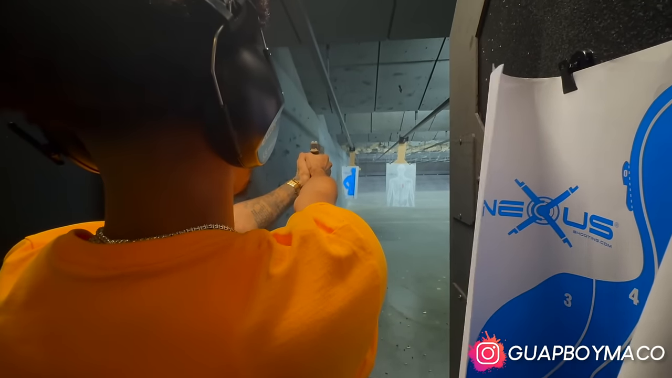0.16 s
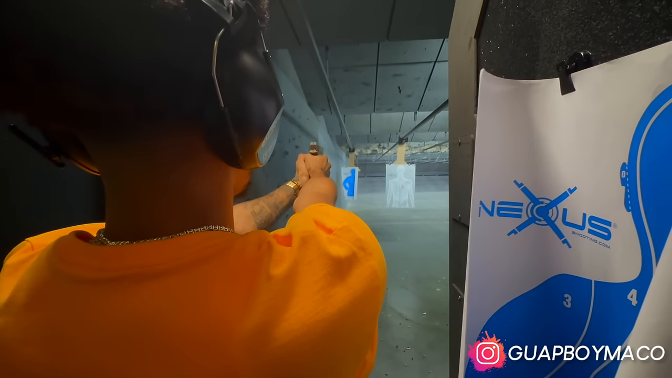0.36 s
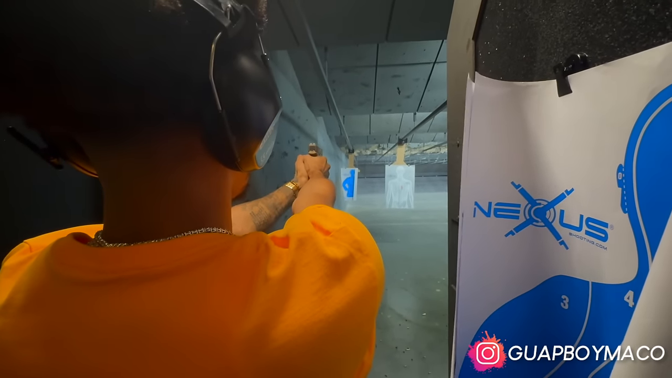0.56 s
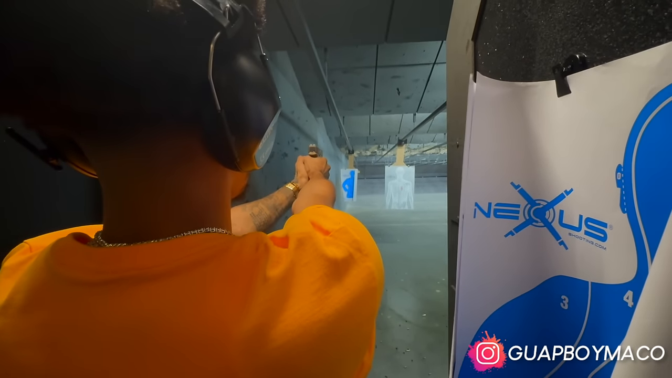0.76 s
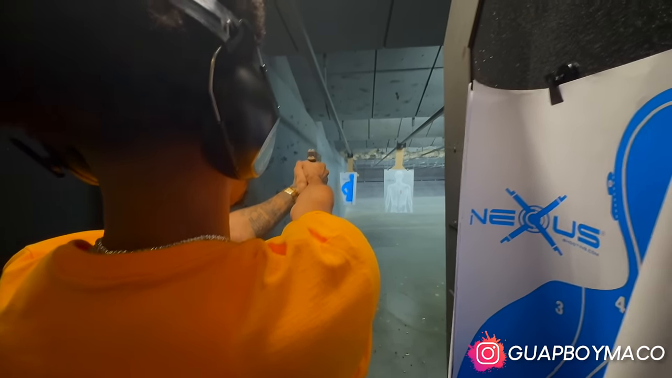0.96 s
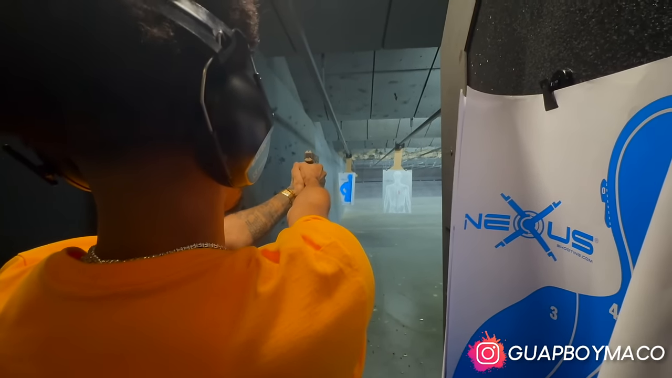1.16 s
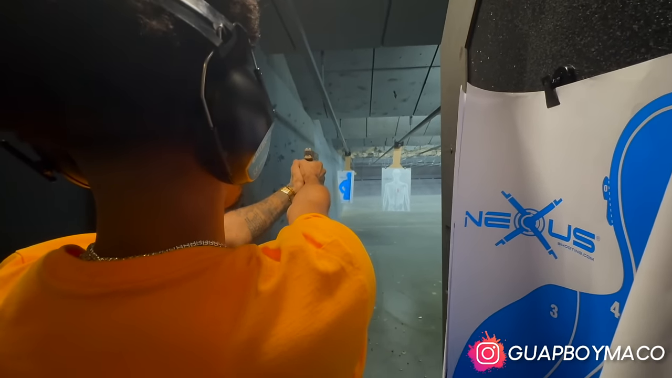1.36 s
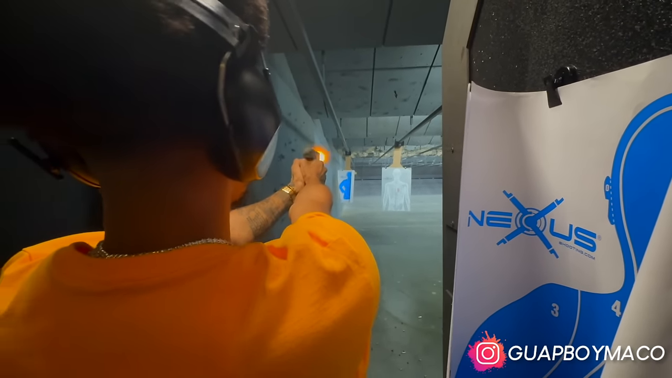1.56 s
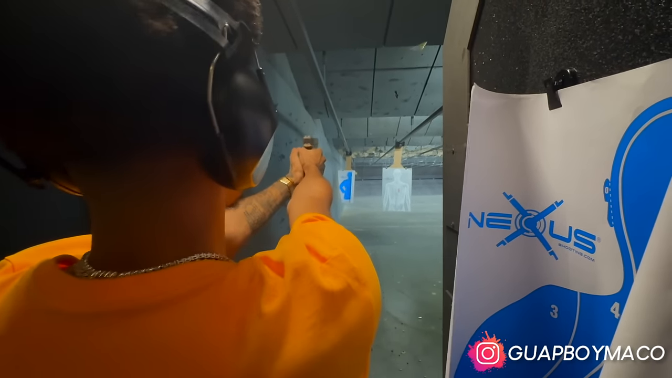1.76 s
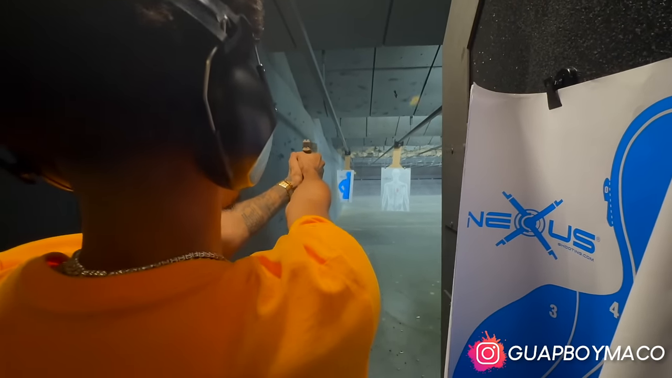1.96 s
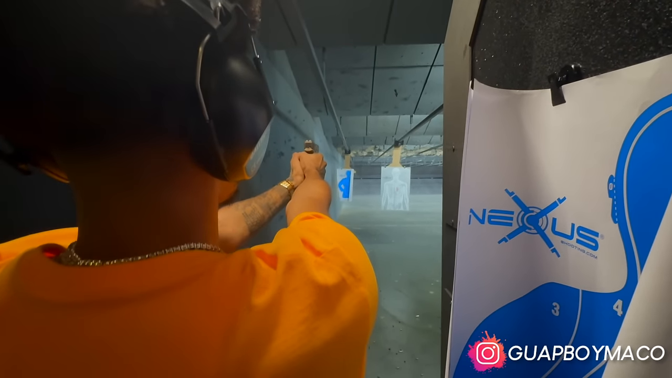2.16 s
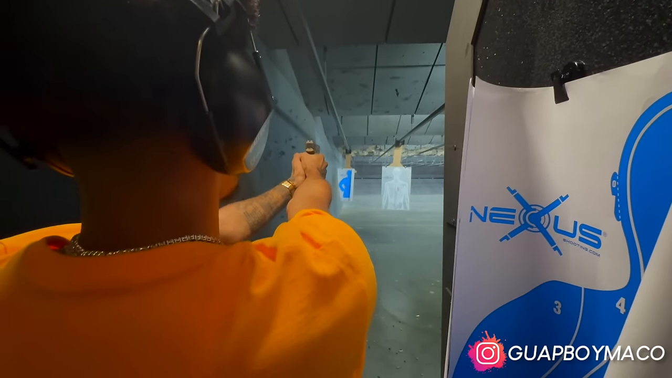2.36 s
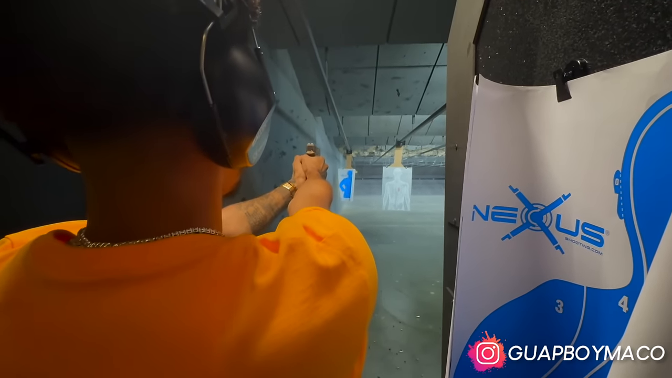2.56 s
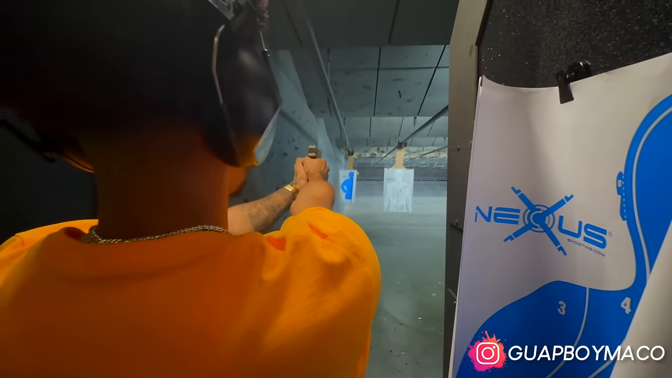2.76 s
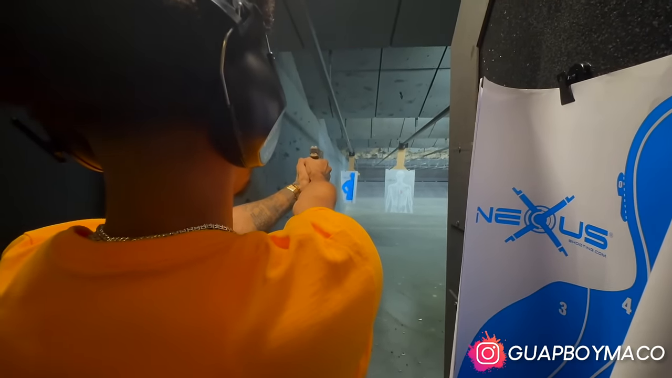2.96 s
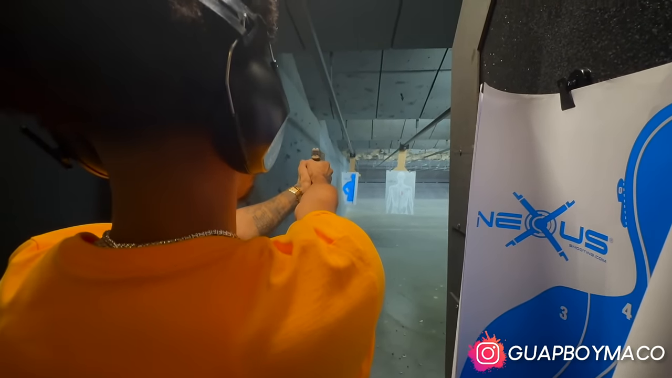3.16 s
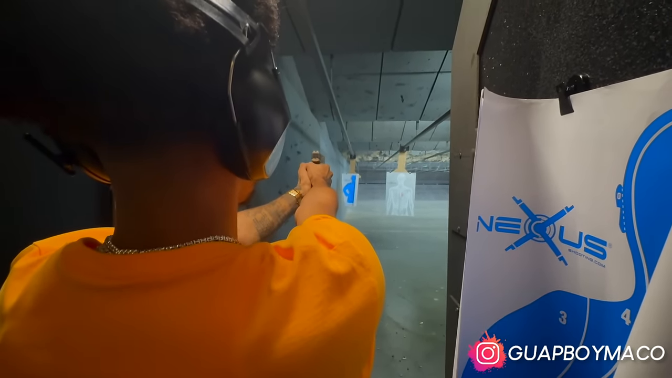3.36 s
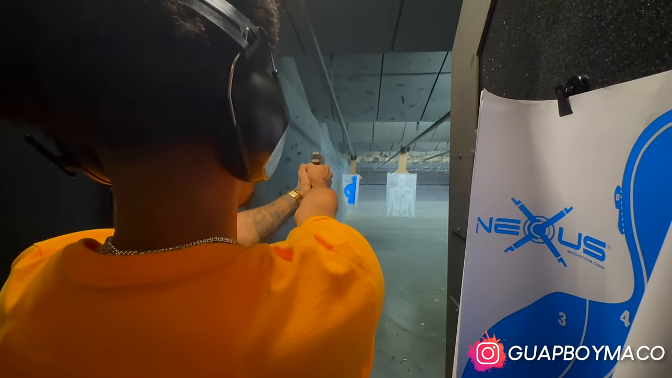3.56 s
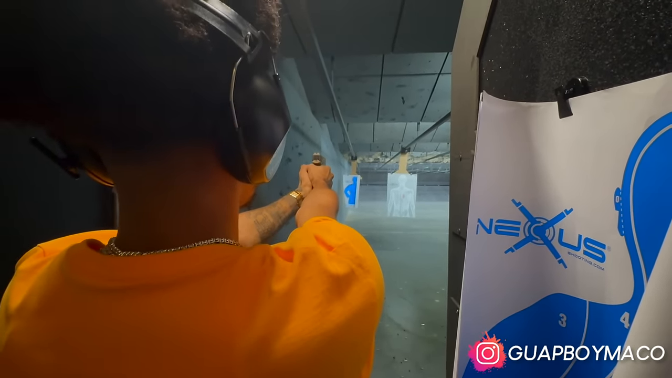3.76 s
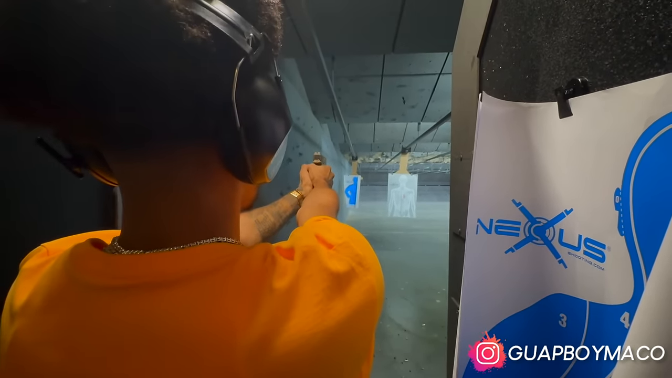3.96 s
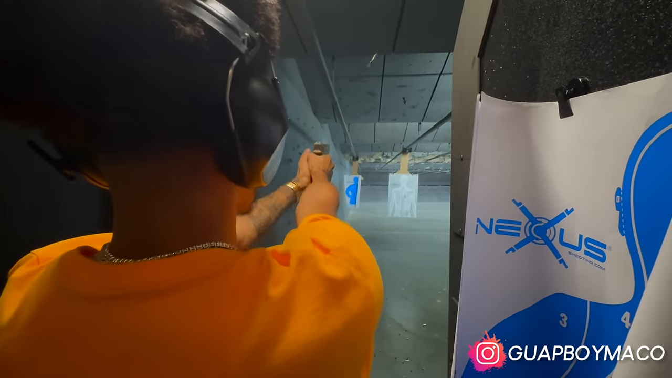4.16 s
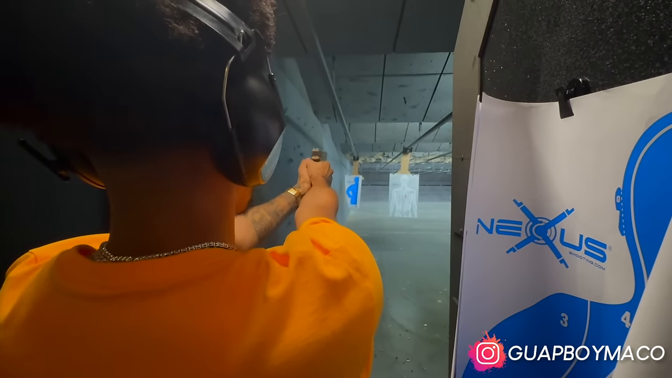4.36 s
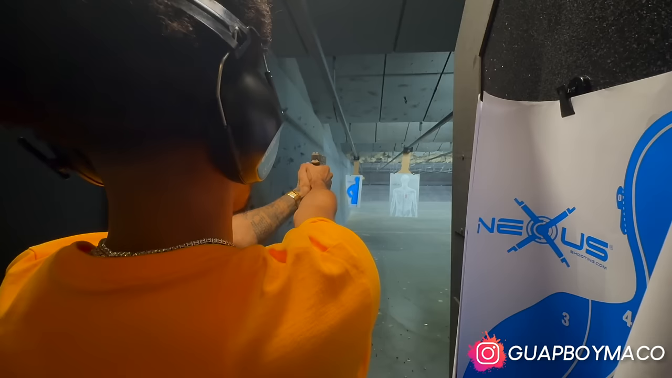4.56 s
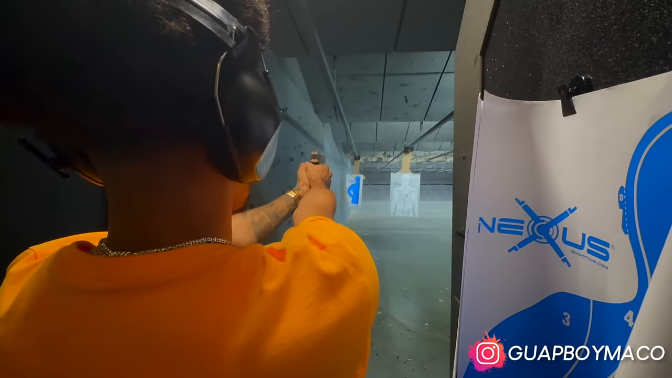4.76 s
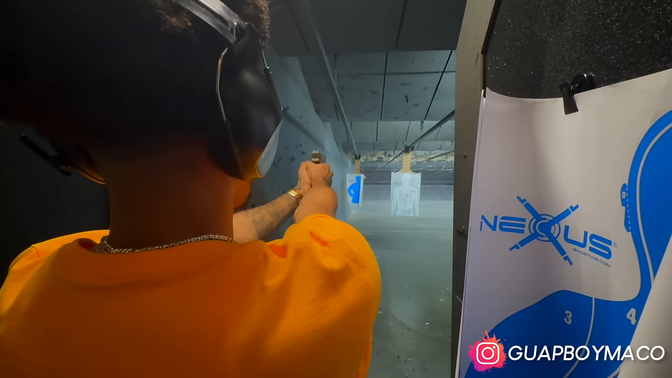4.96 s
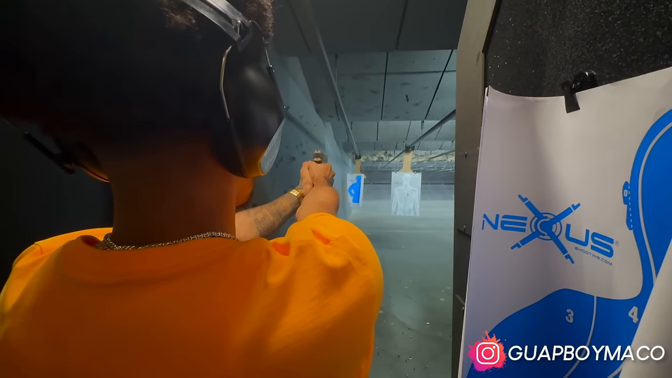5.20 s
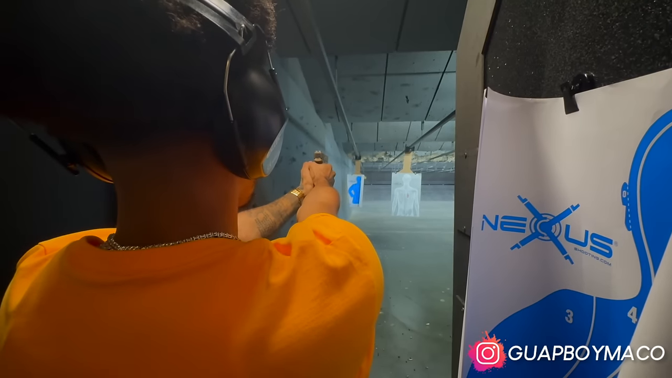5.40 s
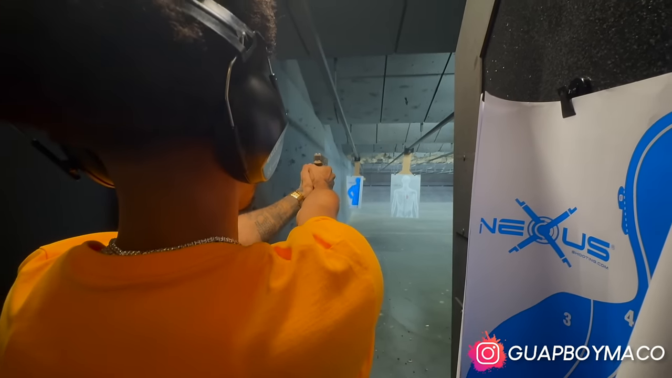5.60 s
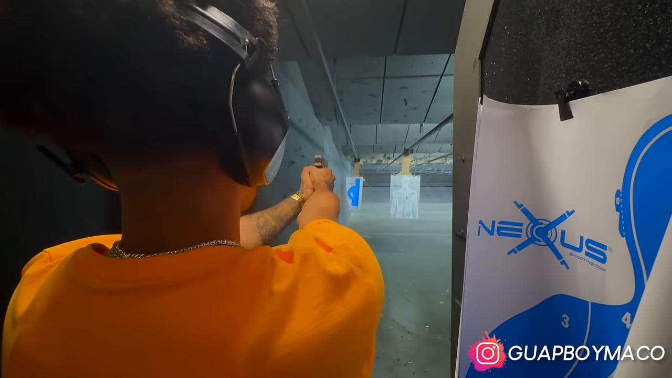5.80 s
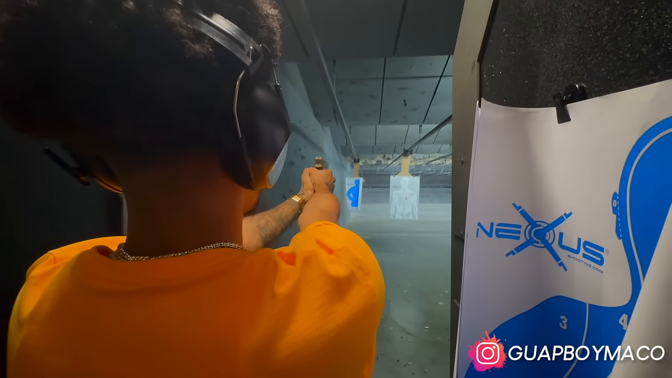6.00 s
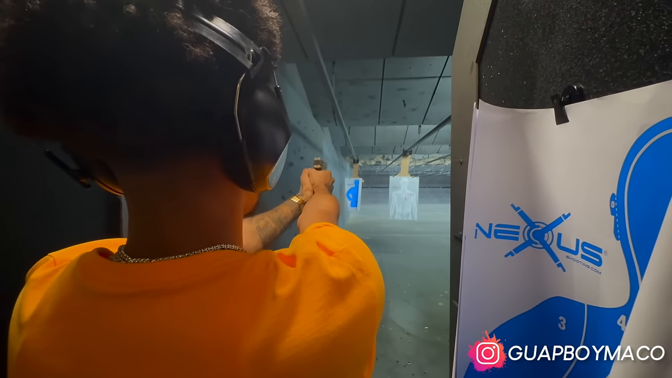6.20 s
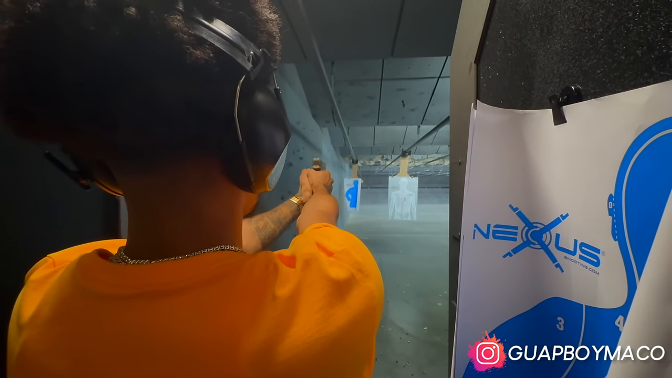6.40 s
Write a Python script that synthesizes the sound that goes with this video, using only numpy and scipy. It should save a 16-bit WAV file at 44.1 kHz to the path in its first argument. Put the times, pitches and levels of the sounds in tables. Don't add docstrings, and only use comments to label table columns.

```python
import sys
import numpy as np
from scipy import signal
from scipy.fft import rfft, irfft
from scipy.io import wavfile
from scipy.ndimage import uniform_filter1d

SR = 44100
rng = np.random.default_rng(int(sys.argv[2]) if len(sys.argv) > 2 else 0)


def gain_from_db(level_db):
    decades = np.asarray(level_db, float) / 20
    return 10 ** decades


def digitize_waveform(pressure):
    field = np.atleast_2d(pressure).T
    bounded = np.clip(field, -1, 1)
    quanta = np.round(bounded * 32767).astype(np.int16)
    wavfile.write(sys.argv[1], SR, quanta)


N = 284004
HZ = np.fft.rfftfreq(N, 1 / SR)
TIME = np.arange(N) / SR


def evened(x):
    return x / np.sqrt(np.mean(x ** 2) + 1e-20)


def wander(shape, size):
    return evened(uniform_filter1d(rng.standard_normal(shape), size=size))


def read(points, hz):
    f, value = np.transpose(points)
    return np.interp(np.log(hz + 1), np.log(f + 1), value)


def add(mix, s, sound):
    part = mix[:, round(s * SR):][:, :sound.shape[1]]
    part += sound[:, :part.shape[1]]


def sides(pan_db):
    return gain_from_db(np.array([[pan_db / 2], [-pan_db / 2]]))


def pair(colour, same, per_s=9000., spread_db=1.5):
    size = gain_from_db(spread_db * np.minimum(rng.exponential(1, (2, N)), 4))
    happens = rng.random((2, N)) < per_s / SR
    a, b = rfft(size * rng.standard_normal((2, N)) * happens)
    likeness = np.clip(read(same, HZ), -1, 1)
    right = likeness * a + np.sqrt(1 - likeness ** 2) * b
    return np.array([a, right]) * gain_from_db(read(colour, HZ))


def band_db(z, lo_hz, hi_hz):
    inside = (HZ > lo_hz) & (HZ < hi_hz)
    return 10 * np.log10(2 * np.mean(np.sum(abs(z[:, inside]) ** 2, 1)) / N ** 2)


def peaks(table):
    return gain_from_db(sum(db / (1 + ((HZ - hz) / width) ** 2) for hz, width, db in table))


def held(age, hold_s, fall):
    knee_s = 0.02
    return -fall * knee_s * np.logaddexp(0, (age - hold_s) / knee_s)


# t/s, level/dB, hold/s, boom at its height/dB, bass in the hall/dB
NEAR_SHOTS = [
    (1.551, -19, 0.024, 6, 0.5),
    (2.435, -16.5, 0.046, 2.5, -9.5),
    (4.023, -18.5, .025, 4, -5.5),
]
# t/s, slap level/dB, hall level/dB, hall hold/s, hall fall/(dB/s)
WALL_ANSWERS = [
    (1.709, -31.5, -34.5, 0.19, 52),
    (2.584, -23.5, -36, 0.19, 54),
    (4.184, -32, -34.5, 0.12, 54.5),
]
SHOT_PAN_DB = [0, -0.37, 0.25]
SHOT_TREBLE_DB = [1, -2.5, 0.5]
SHOT_LANE = [0, 1, 0]
# f/Hz, level/(dB per Hz)
NEAR_COLOUR = [(30, -33.5), (48, -20), (70, -5.5), (141, -16), (180, -8), (300, -5), (554, -6.5), (800, -4),
               (1450, -11), (1850, -14.5), (3300, -17.5), (7000, -27.5), (8600, -28), (11000, -42)]
# f/Hz, width/Hz, level/dB
STALL_PEAKS = [(178, 22, 1.5), (303, 22, 2.5), (422, 9.9, 2), (761.4, 16, 4.5), (884.7, 41, 4),
               (1090, 27, 3), (1200, 18, 5), (1370, 46, 5.5), (1487, 18, 4), (1646, 14, 4.5),
               (1840, 6, 5.5), (2100, 30, 4), (2810, 30, 5.5), (3420, 30, 0)]
# f/Hz, likeness [-1..1]
HALL_SAME = [(40, 0.57), (90, 0.85), (180, 0.86), (350, .65), (640, -.05), (1650, -0.096), (5000, .05)]
# f/Hz, share [1]
TREBLE_SHARE = [(900, 0.35), (2200, 0.44), (5200, .95), (10000, 1.86), (15000, 2)]
# f/Hz, share [1]
BASS_SHARE = [(120, 0.51), (200, 0.089)]
# f/Hz, share [1]
BOOM_SHARE = [(130, 0.05), (240, 0.7), (480, 0.2), (800, 0)]


def hall():
    z = pair(NEAR_COLOUR, HALL_SAME) * peaks(STALL_PEAKS)
    z *= gain_from_db(2.5 * np.clip((HZ - 500) / 500, 0, 1) * wander(len(HZ), 130))
    middle_db = band_db(z, 500, 1800)
    treble_db = band_db(z, 3000, 9000) - middle_db
    bass_db = band_db(z, 50, 150) - middle_db
    boom_db = band_db(z, 180, 450) - middle_db
    centres = np.geomspace(60, 15360, 9)
    place = np.interp(np.log(HZ + 1), np.log(centres), np.arange(9))
    bands = [irfft(z * np.maximum(1 - abs(place - k), 0), N) for k in range(9)]
    out, age = np.zeros((2, N)), TIME[:70000]
    flat = np.zeros_like(age)
    clumps_db = 1.6 * wander((2, 9, 2, len(age)), 1500)

    flash_db, flash_s = 5.5, 0.004
    dull_db, dulling, dullest_db = -4, 23.6, -20.5
    dull = dull_db + dullest_db * np.tanh(1.18 * dulling * age / -dullest_db)
    bass_start_db, bass_end_db, bass_s = -21.5, -5.5, 0.011
    stall_bass = bass_end_db + (bass_start_db - bass_end_db) * np.exp(-age / bass_s)
    boom_start_db, boom_at_s, boom_s = -10.5, 0.1, 0.051
    swell = np.exp(-((age - boom_at_s) / boom_s) ** 2)
    lull_db = -5 * np.exp(-((age - 0.017) / 0.004) ** 2)
    stall_fall, slap_fall = 146, 120
    last_db, last_fall = -19, 21

    shots = zip(NEAR_SHOTS, WALL_ANSWERS, SHOT_PAN_DB, SHOT_TREBLE_DB, SHOT_LANE)
    for (s, db, hold, top_db, low_db), answer, pan_db, bright_db, lane in shots:
        back, slap_db, hall_db, linger, fall = answer
        since = age - (back - s)
        silent = np.where(since < 0, -200, 0)
        late = 20 * np.log10(gain_from_db(held(since, linger, fall)) + gain_from_db(last_db - last_fall * since))
        level = np.array([db + held(age, hold, stall_fall) + lull_db,
                          slap_db - slap_fall * since + silent,
                          hall_db + late + silent])
        treble = np.array([dull + bright_db + flash_db * np.exp(-age / flash_s), dull + 2.5, dull])
        bass = np.array([stall_bass, flat - 16.5, flat + low_db])
        boom = np.array([boom_start_db + (top_db - boom_start_db) * swell, flat - 1.5, flat - 1])
        start = lane * len(age)
        for hz, band, clump_db in zip(centres, bands, clumps_db[lane]):
            part_db = level - middle_db + 2.0
            part_db += read(TREBLE_SHARE, hz) * (treble - treble_db)
            part_db += read(BASS_SHARE, hz) * (bass - bass_db)
            part_db += read(BOOM_SHARE, hz) * (boom - boom_db)
            rise = 1 - np.exp(-age / (0.0004 + 1.2 / hz))
            gain = np.sqrt(gain_from_db(2 * part_db[:, ::8]).sum(0)).repeat(8) * rise
            lean = sides(pan_db + 2.5 * (hz < 150))
            add(out, s, lean * gain_from_db(clump_db) * gain * band[:, start:start + len(age)])
    return out


# t/s, peak level/dB, left-right level/dB, pulse/ms, t60/s
FRONTS = [
    (1.5505, -3, 3, 0.16, 0.029),
    (1.71, -14, 0, .14, .02),
    (2.4085, -18.5, -1, 0.052, .12),
    (2.434, -14, 2, 0.82, 0.044),
    (2.442, -12, 2.5, 0.092, .015),
    (2.5835, -8.5, -1.5, 0.14, .024),
    (2.602, -19.5, 3.5, .3, .02),
    (4.0228, -3.5, 4.5, 0.21, 0.032),
    (4.183, -21, -2.5, .12, 0.019),
]


def fronts():
    out, t = np.zeros((2, N)), np.arange(4000) / SR
    for s, db, pan_db, ms, t60 in FRONTS:
        u = t[:400] * 1000 / ms
        pulse = (1 - u) * np.exp(-u)
        taps = rng.choice([-1., 1.], (2, len(t))) * (rng.random((2, len(t))) < 5000 / SR)
        taps[:, 0] = 0.14
        flurry = signal.fftconvolve(taps * gain_from_db(-60 * t / t60), pulse[None], axes=1)
        add(out, s, sides(pan_db) * gain_from_db(db - 2.5) * flurry)
    return out


# delay t/s, f/Hz, half length/s, level/dB
THUMPS = [(0.028, 441.5, 0.01, -2), (0.0044, 1000, 0.0034, 0), (.024, 1150, .003, -1),
          (.042, 1350, .004, -3), (.019, 1450, .003, -4), (.345, 900, .02, -19), (.03, 182, 0.013, 1),
          (0.033, 670, .014, -1.5), (.055, 300, 0.0069, -1.5), (.067, 327, 0.011, 2), (.072, 890, 0.01, -5),
          (.089, 265, .01, -2), (.092, 427, 0.017, -1.5), (.105, 360.4, 0.019, -1), (0.16, 240, .012, -7),
          (.265, 398.5, .025, -12), (0.343, 308, 0.016, -21), (0.354, 1400, 0.012, -18),
          (0.3, 920, 0.035, -16), (0.298, 313, 0.014, -14), (0.377, 286, .012, -20),
          (0.179, 1450, 0.009, -14), (0.162, 1163, 0.0094, -12), (0.55, 210, .015, -23),
          (.66, 340, 0.018, -29)]
# delay t/s, f/Hz, half length/s, level/dB
NEXT_THUMPS = [(.005, 251.2, .007, 3), (.004, 453.2, .007, -0.5), (0.038, 176.7, 0.0086, 2.5),
               (.043, 458, .01, -2), (0.061, 749.7, .016, -4.5), (0.063, 299.7, .022, 0),
               (.168, 1138, 0.005, -1.5), (0.261, 300.8, 0.03, -11), (0.15, 1170, .004, -2),
               (.028, 1150, .006, -3), (.038, 1600, .003, -4), (.072, 1050, .005, -5),
               (0.159, 230, .012, -4), (.195, 301.4, .012, -8.5), (.252, 900, 0.0085, -14),
               (0.358, 330, .015, -19.5), (0.408, 303, .012, -23)]
THUMP_DB = [-0.5, 1.5, -2.5]


def thumps():
    out, t, echoes = np.zeros((2, N)), TIME[:32000], []
    for rows in (THUMPS, NEXT_THUMPS):
        turns = rng.random((len(rows), 1)) + 0.12 * rng.standard_normal((len(rows), 2))
        echo = np.zeros((2, len(t)))
        for (s, hz, half, db), turn in zip(rows, turns):
            burst = gain_from_db(db) * np.exp(-((t - s) / half) ** 2)
            echo += burst * np.sin(2 * np.pi * (hz * t + turn[:, None]))
        echoes.append(echo)
    for shot, db, lane in zip(NEAR_SHOTS, THUMP_DB, SHOT_LANE):
        add(out, shot[0], gain_from_db(shot[1] + db) * echoes[lane])
    return out


# delay t/ms, level/dB, left-right level/dB, pulse/ms
MIRRORS = [(1.103, -6.5, 2.5, .07), (3.35, -7, 9, 0.074), (5.03, -6, 8.5, 0.18), (5.47, -7, -9, 0.11),
           (19.9, -6, 9, .2), (22.1, -9, -9.5, .15), (23.92, -7, 9, 0.23), (42.3, -7.5, 2, .2),
           (51.8, -12.5, -8.5, .2), (67.2, -16, -9.5, 0.18), (75, -13, 9, 0.2), (76.6, -13, -8.5, 0.25),
           (80.3, -14, 11, .2), (106, -16, 8.5, .3)]
# delay t/ms, level/dB, left-right level/dB, pulse/ms
NEXT_MIRRORS = [(1.302, -8.5, 9, .3), (4.496, -4, -9, .25), (5.55, -4, 9.5, .25), (8.84, -9, -9, .07),
                (10.1, -7.5, 9, .07), (14.5, -7, 8, 0.13), (23.5, -7, -9.5, .2), (26, -6.5, 9.5, .15),
                (29.3, -7.5, -9, 0.13), (33.7, -5, 10, .2), (40.48, -5.5, 3, .2), (43.78, -6, -8.5, .2),
                (53, -7, 8.5, .3), (57, -7, 4.5, .25), (68, -6.5, 5.5, 0.46), (73.4, -9.5, -9, 0.21)]
# t/s, level/dB
BLASTS = [
    (1.551, -0.5),
    (2.433, 0),
    (4.023, 0),
]


def mirrors():
    out, echoes, ms = np.zeros((2, N)), [], TIME[:300] * 1000
    for rows in (MIRRORS, NEXT_MIRRORS):
        echo = np.zeros((2, 6000))
        signs = rng.choice([-1., 1.], len(rows))
        for (delay_ms, db, pan_db, pulse_ms), sign in zip(rows, signs):
            u = ms / pulse_ms
            pulse = u * (2 - u) * np.exp(-u)
            add(echo, delay_ms / 1000, sign * sides(pan_db) * gain_from_db(db + 2.5) * pulse)
        echoes.append(echo)
    for (s, db), lane in zip(BLASTS, SHOT_LANE):
        add(out, s, gain_from_db(db - 2.0) * echoes[lane])
    return out


# t/s, level/dB, top level/dB, bass against it/dB, t60/s
FAR_DULL = [
    (0.49, -68, 16, -17, 0.68),
    (0.944, -46.5, 4, -4.5, 0.32),
    (2.006, -53.5, 17, -8, 0.4),
    (4.55, -52.5, 7, -1, 0.36),
]
# t/s, level/dB, top level/dB, bass against it/dB, t60/s
FAR_SHARP = [
    (1.089, -54, 0.5, -3.5, 0.38),
    (1.86, -54, 8, -7, 0.14),
    (2.409, -36, 5.5, -25, 0.15),
    (4.695, -59.5, 5, -4.5, 0.19),
]
# f/Hz, level/(dB per Hz)
FAR_COLOUR = [(100, -40), (150, -5.5), (250, 0), (380, -4.5), (590, -12), (1240, -12), (1600, -13.5),
              (2400, -20), (3100, -30), (4700, -21), (6800, -35), (8600, -25.5), (10800, -43.5),
              (15000, -46)]
# f/Hz, width/Hz, level/dB
FAR_PEAKS = [(355, 18, 2.5), (1530, 67, 4.5), (2220, 60, 8.5), (4370, 68, 3.5)]


def far_shots():
    z = pair(FAR_COLOUR, HALL_SAME, per_s=17000.0, spread_db=-0.5) * peaks(FAR_PEAKS)
    z /= gain_from_db(band_db(z, 3000, 10000))
    low = np.clip(np.log(3100 / (HZ + 1)) / 0.64, 0, 1)
    high = np.clip(np.log((HZ + 1) / 9300) / 0.25, 0, 1)
    bass, middle, top = irfft(z * low, N), irfft(z * (1 - low - high), N), irfft(z * high, N)
    out, t = np.zeros((2, N)), np.arange(SR) / SR
    start = 1 - np.exp(-t / 0.002)
    late = gain_from_db(-17.0 - 60 * t / 0.56)
    rows = [(*row, -26) for row in FAR_DULL] + [(*row, 4.5) for row in FAR_SHARP]
    for s, db, top_db, bass_db, t60, first_db in rows:
        span = slice(round(s * SR), round(s * SR) + SR)
        first = gain_from_db(first_db - 60 * t / 0.057)
        bass_gain = gain_from_db(bass_db - 60 * t / (2.5 * t60)) * (1 - 0.8 * np.exp(-t / 0.02) + 0.4 * first)
        middle_gain = gain_from_db(-60 * t / t60) + late + first
        top_gain = gain_from_db(top_db - 60 * t / (0.52 * t60)) * (1 + first)
        sound = bass_gain * bass[:, span] + middle_gain * middle[:, span] + top_gain * top[:, span]
        add(out, s, gain_from_db(db - 0.5) * start * sound)
    return out


# t/s, f/Hz, width/Hz, level/dB, t60/s
KNOCKS = [(0.504, 8700, 500, -61, 0.15), (.505, 1800, 400, -64.5, 0.22), (.5, 6400, 1300, -65, 0.31),
          (1.1, 4200, 1500, -59.5, 0.61), (5.053, 1200, 500, -51, 0.032), (.955, 1550, 230, -42, 0.28),
          (.96, 410, 120, -44, 0.37), (.947, 2100, 250, -51, .1), (1.093, 1530, 47, -43, 0.25),
          (1.092, 4330, 150, -45, 0.12), (1.092, 2200, 250, -45, .06), (2.419, 1140, 700, -30.5, .2),
          (.968, 940, 270, -43.5, 0.23), (1.11, 350, 110, -42.5, .4), (1.145, 2240, 120, -54.5, .3),
          (2.584, 3000, 1400, -18.5, .03), (5.078, 5900, 450, -45, 0.098), (.947, 13800, 900, -70, .3),
          (1.092, 13800, 900, -70, .2), (.502, 2900, 700, -67, .2), (5.828, 4600, 300, -63, .1),
          (5.828, 5900, 400, -63, .08), (1.1, 3200, 500, -60, .4), (5.09, 2450, 150, -62, .1),
          (1.091, 4700, 500, -37.5, 0.05), (1.093, 8700, 500, -50, 0.086), (1.1, 1900, 470, -41.5, 0.15),
          (1.71, 3200, 1600, -24.5, 0.03), (2.85, 5800, 760, -49, 0.16), (3.091, 5194, 499.3, -57, 0.082),
          (4.184, 2900, 1400, -27, 0.035), (4.696, 1720, 560, -43, 0.16), (4.697, 4200, 600, -56, 0.1)]


def ringing_knocks():
    out, t = np.zeros((2, N)), np.arange(SR // 4) / SR
    f = np.fft.rfftfreq(len(t), 1 / SR)
    for s, hz, width, db, t60 in KNOCKS:
        resonance = 1 / (1 + ((f - hz) / width) ** 4)
        band = evened(irfft(rfft(rng.standard_normal((2, len(t)))) * resonance, len(t)))
        add(out, s, gain_from_db(db - 60 * t / t60) * (1 - np.exp(-t / 0.00044)) * band)
    return out


# t/s, peak level/dB, centre f/Hz, left-right level/dB, t60/s
BOUNCES = [(0.043, -65, 8000, -0.5, 0.071), (1.857, -48, 14500, 0, .04), (2.847, -35.5, 10900, 0, 0.086),
           (3.091, -53, 9450, 0, 0.044), (3.228, -73.5, 9480, 6, 0.089), (3.297, -52, 8480, 1, 0.24),
           (3.299, -54, 3200, 2, 0.16), (3.3, -64, 14000, 0, .3), (3.555, -62.5, 7130, -1, 0.25),
           (3.701, -69, 3800, 1, 0.12), (3.8891, -70, 7480, 0, 0.061), (5.05, -71, 7200, 0, 0.041),
           (5.076, -40, 10500, 0, 0.1), (5.079, -43.5, 4190, 2, 0.2), (5.1355, -48, 2600, 4, 0.06),
           (5.1558, -50, 2800, 0, 0.061), (5.257, -41.5, 4630, 2.5, 0.1), (5.3815, -47.5, 3620, 0.5, 0.14),
           (5.448, -50, 3900, 2, 0.15), (5.513, -55.5, 4520, 1, 0.18), (5.54, -55.5, 4000, 3, 0.091),
           (5.827, -47, 6110, 1, 0.15), (5.93, -67, 10500, 3, 0.16), (5.95, -65, 7500, -1.5, 0.15)]
# f/Hz, level/dB
CONCRETE = [(1200, 8), (2200, 4.5), (3400, -1.5), (5000, 2.5), (7000, -5.5), (8700, -4.5), (10500, -13),
            (14500, -19)]
# t/s, f/Hz, level/dB, t60/s
RINGS = [(.046, 10800, -78, 0.21), (2.851, 9960, -66, 0.56), (3.091, 9900, -83, 0.26),
         (3.231, 9940, -77.5, 0.6), (3.3, 9120, -65, 0.06), (3.35, 15000, -80, 0.3), (1.815, 9860, -63, .3),
         (3.43, 9900, -88, .8), (3.3, 3060, -68, .08), (3.3, 3400, -68, .08), (3.885, 8540, -81, 0.29),
         (4.351, 10050, -68, 0.23), (5.079, 2850, -52, 0.05), (5.08, 5840, -49.5, 0.091),
         (5.084, 9960, -69, 0.52), (5.136, 1846, -61, 0.087), (5.136, 2580, -61, 0.04),
         (5.136, 5000, -68, .04), (5.157, 2620, -65, 0.05), (5.157, 1890, -68, .1),
         (5.155, 10030, -71, 0.36), (5.258, 3660, -62, .06), (5.258, 5200, -64, .06),
         (5.258, 6310, -68, 0.07), (5.383, 3750, -67, .06), (5.383, 5100, -67, 0.056),
         (5.45, 2370, -68, .1), (5.45, 2760, -70, .08), (5.45, 3750, -66, .06), (5.515, 4950, -71, .08),
         (5.54, 5040, -75, .1), (5.52, 10100, -77, .35), (5.765, 9100, -88, .15), (5.385, 2390, -63, 0.093),
         (5.45, 10060, -76, 0.47), (5.452, 5150, -62, 0.071), (5.542, 2090, -66, 0.14),
         (5.828, 15050, -69.5, .35), (5.8281, 14530, -73, 0.14), (5.8282, 12980, -58.5, 0.25),
         (5.8283, 11830, -71, 0.36), (5.8288, 10960, -77, 0.24), (5.8285, 10170, -67.5, 0.45),
         (5.8286, 9430, -72, 0.2), (5.941, 10970, -65, 0.29), (5.951, 10080, -66, 0.22)]


def casings():
    out, t = np.zeros((2, N)), np.arange(SR // 2) / SR
    f = np.fft.rfftfreq(len(t), 1 / SR)
    for s, db, hz, pan_db, t60 in BOUNCES:
        width = 0.74 + 0.008 * (db + 50)
        colour = gain_from_db(read(CONCRETE, f) - 9.8 * (np.log((f + 1) / hz) / width) ** 2)
        clumps = gain_from_db(1.6 * wander(len(t), 150))
        scatter = evened(irfft(rfft(rng.standard_normal((2, len(t)))) * colour)) * clumps
        decay = gain_from_db(-60 * t / t60) + 0.6 * gain_from_db(-60 * t / 0.04) + gain_from_db(-22.5 - 60 * t / 0.35)
        add(out, s, sides(pan_db) * gain_from_db(db - 9.0) * scatter * decay * (1 - np.exp(-t / 0.00085)))
    for s, hz, db, t60 in RINGS:
        resonance = 1 / (1 + ((f - hz) / 60.) ** 2)
        spin = evened(irfft(rfft(rng.standard_normal((2, len(t)))) * resonance))
        tone = np.sin(2 * np.pi * (hz * t + rng.random((2, 1))))
        ring = 0.3 * tone + 0.8 * spin
        add(out, s, gain_from_db(db + 7.0 - 60 * t / t60) * np.minimum(t / 0.00099, 1) * ring)
    return out


# f/Hz, level/(dB per Hz)
AIR = [(20, -22.5), (35, -24.5), (55, -9), (85, -10), (125, -8), (150, -15.5), (273, -19), (406, -35.5),
       (1400, -34.5), (2260, -45.5), (5800, -54), (7200, -63), (8600, -57), (11000, -76)]
# t/s, level/dB
AIR_LEVEL = [(0.0, -55), (0.65, -54.5), (1.5, -50.5), (2.5, -52.5), (3.1, -58.5), (4.0, -57.5),
             (4.6, -55.5), (5.0, -54), (6.44, -51)]
# f/Hz, likeness [-1..1]
AIR_SAME = [(60, 1.0), (240, 0.94), (950, -0.094), (3770, 0.46), (15000, 0.26)]
# f/Hz, width/Hz, level/dB
HUM = [
    (65.02, 6.3, -54.5),
    (118, 1.6, -59),
    (620, 9, -82),
    (850, 81, -76.5),
]


def ventilation():
    z = pair(AIR, AIR_SAME, per_s=SR, spread_db=0.0)
    white = pair([(1, 0), (2, 0)], AIR_SAME, per_s=SR, spread_db=0)
    drones = sum(gain_from_db(db + 70) / np.sqrt(width) * white / (1 + ((HZ - hz) / width) ** 2)
                 for hz, width, db in HUM)
    rush = z / gain_from_db(band_db(z, 40, 240) + 3.5) + drones * gain_from_db(24.0)
    rumble_db = sum(5.5 * np.exp(-((TIME - shot[0] - 0.28) / 0.24) ** 2) for shot in NEAR_SHOTS)
    s, db = np.transpose(AIR_LEVEL)
    return gain_from_db(np.interp(TIME, s, db) + rumble_db) * irfft(rush, N)


def scene():
    shots = hall() + thumps() + mirrors() + fronts() + far_shots()
    return shots + ringing_knocks() + casings() + ventilation()


# t/s, level at the attack/dB, lead/ms, fall/dB
SMEARS = [
    (0.9443, -55, 4, 12),
    (1.0912, -50, 12, 14),
    (1.5513, -20.5, 14.2, 20),
    (2.4091, -44, 11.5, 19),
    (4.0231, -33.5, 30, 32),
    (5.078, -55.5, 6.3, 12.5),
    (5.8286, -66.5, 8.6, 5),
]


def smears():
    out = np.zeros((2, N))
    for s, db, lead_ms, fall_db in SMEARS:
        lead = lead_ms / 1000
        t = np.linspace(0, 1, round(lead * SR))
        band_hz = [400 if db > -55 else 2400, 6500]
        band = signal.butter(6, band_hz, "band", fs=SR, output="sos")
        hiss = evened(signal.sosfilt(band, rng.standard_normal((2, 2000))))
        add(out, s - lead, gain_from_db(db - fall_db * (1 - t)) * np.minimum(t / 0.091, 1) * hiss[:, -len(t):])
    return out


def thinned(x, quiet_db=-113., under_db=32.5, chance_db=4.5):
    hz, _, z = signal.stft(x, SR, nperseg=1024)
    power = (abs(z) ** 2).mean(0)
    middle_db = 10 * np.log10(power[(hz > 300) & (hz < 4000)].mean(0) + 1e-14)
    floor_db = np.maximum(quiet_db, middle_db - under_db)
    edges = np.arange(9500, 16600, 350)
    for lo, hi in zip(edges, edges[1:]):
        band = (hz >= lo) & (hz < hi)
        luck = chance_db * wander(len(middle_db), 6)
        margin = 10 * np.log10(power[band].max(0) + 1e-14) - floor_db + luck
        z[:, band] *= np.clip(margin / 6.0, 0, 1)
    return signal.istft(z, SR, nperseg=1024)[1][:, :N]


# f/Hz, level/dB
PORTS = [(60, 0.0), (110, 0.0), (200, -0.5), (380, -1.0), (700, 2.5), (1290, 2.5), (2380, 0.5), (4400, 0.5),
         (8120, -2.0), (15000, 0.0)]


def top_cut(x):
    return signal.sosfilt(signal.butter(12, 16470, fs=SR, output="sos"), x)


def record(dry):
    dip_db = -22.5 * np.exp(-((HZ - 12550) / 520) ** 4)
    bump_db = 2.5 * np.exp(-((HZ - 14300) / 900) ** 2)
    balance = gain_from_db(np.outer([0.5, -0.5], read(PORTS, HZ)))
    response = gain_from_db(dip_db + bump_db) * balance / np.sqrt(1 + (HZ / 14900) ** 80)
    x = irfft(rfft(dry + smears()) * response, N)
    mix = thinned(1.065 * np.tanh(x / 1.114))
    return top_cut(mix)


dry = scene()
out = record(dry)
digitize_waveform(out)
```